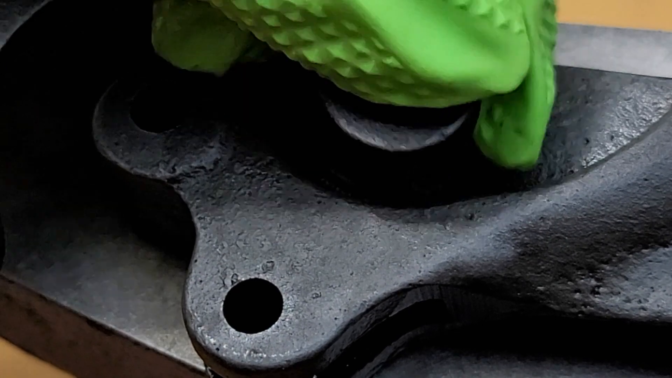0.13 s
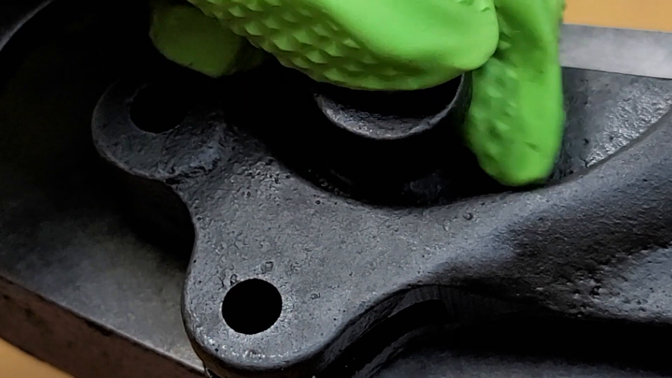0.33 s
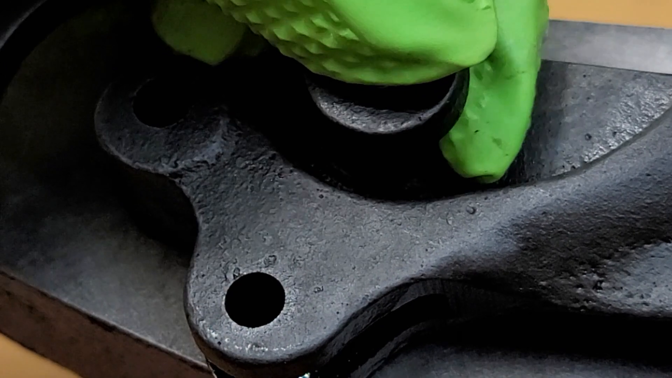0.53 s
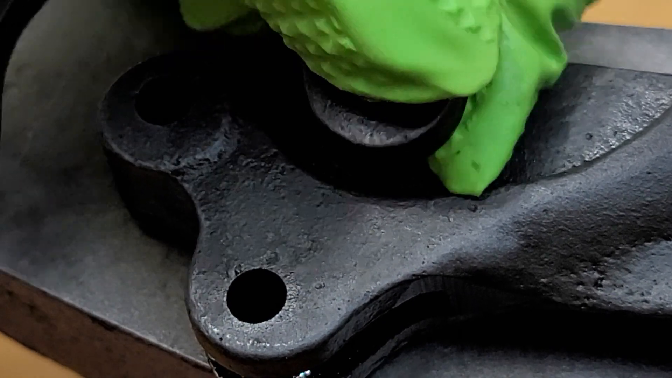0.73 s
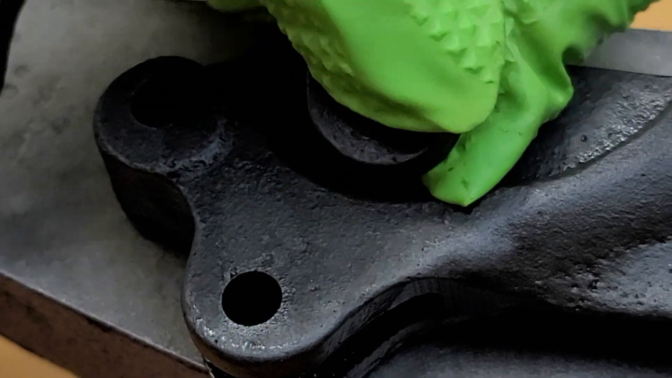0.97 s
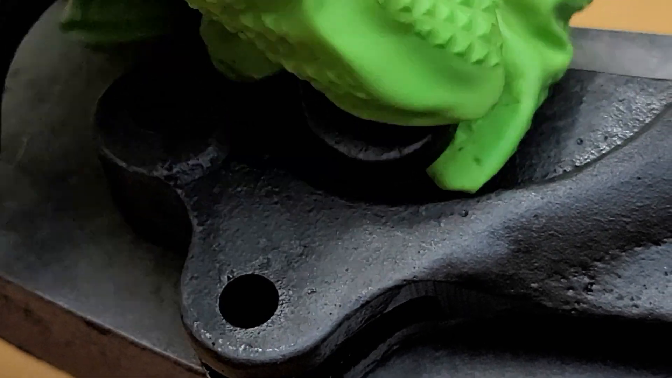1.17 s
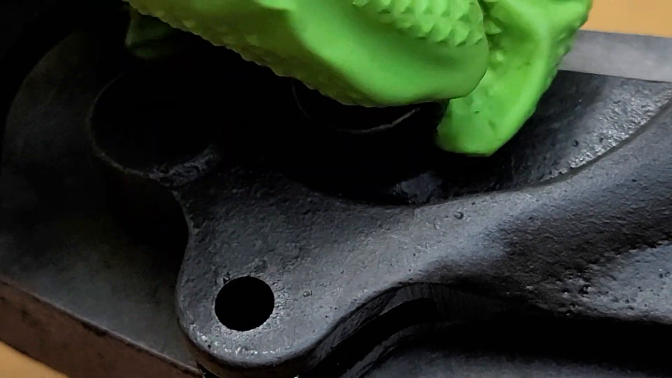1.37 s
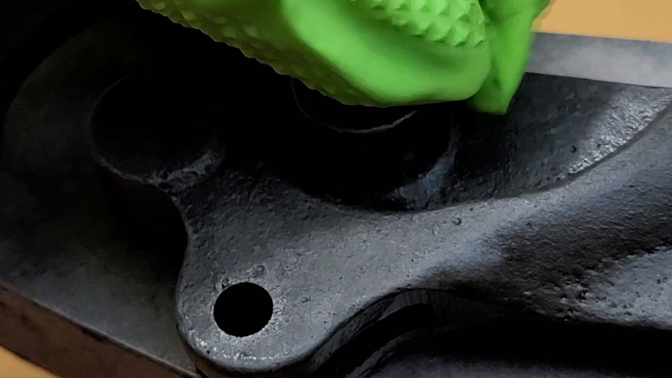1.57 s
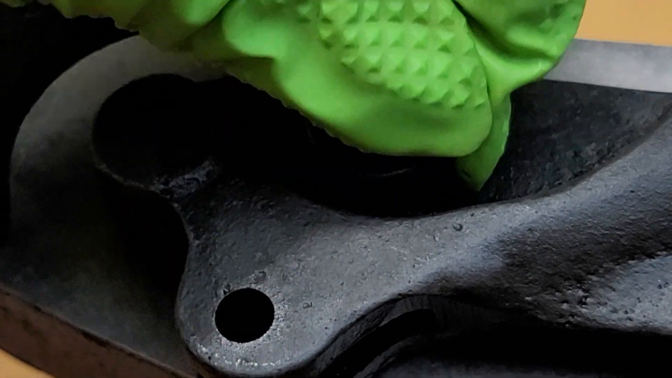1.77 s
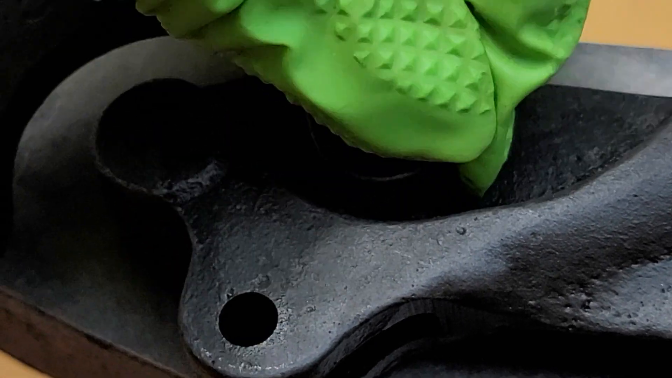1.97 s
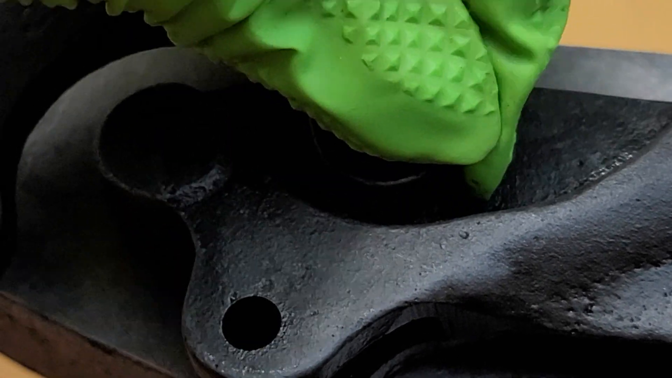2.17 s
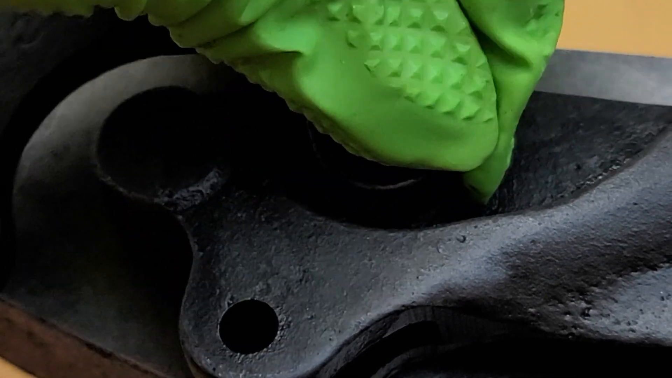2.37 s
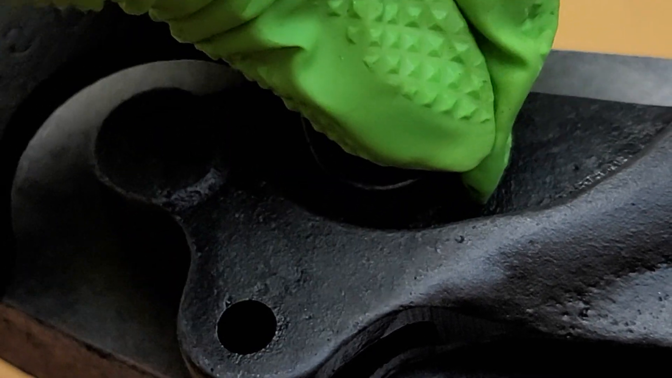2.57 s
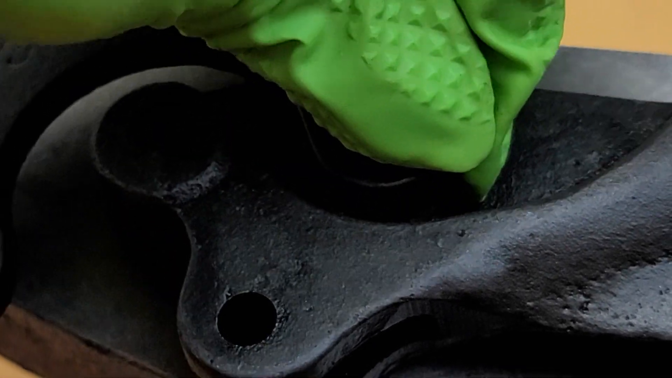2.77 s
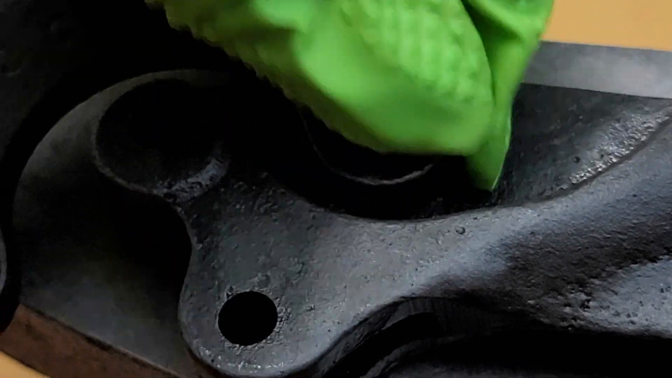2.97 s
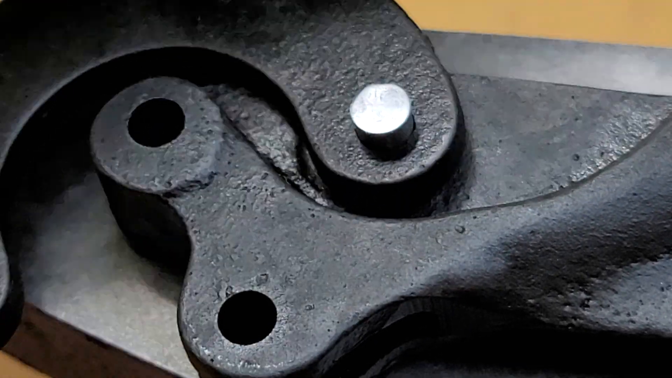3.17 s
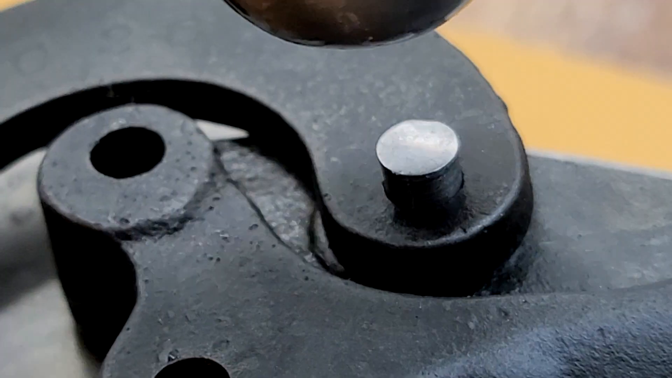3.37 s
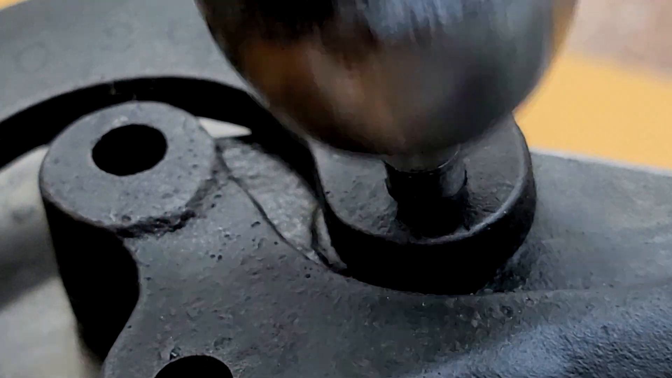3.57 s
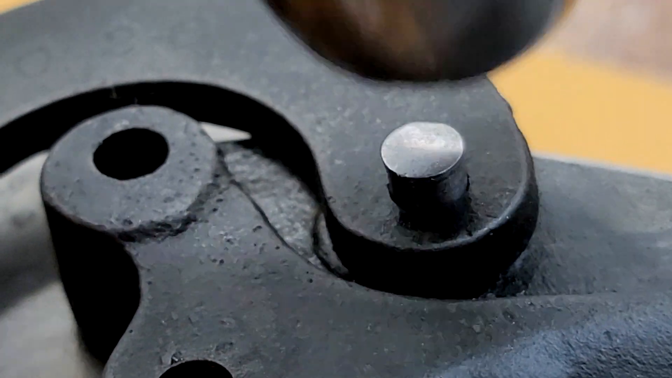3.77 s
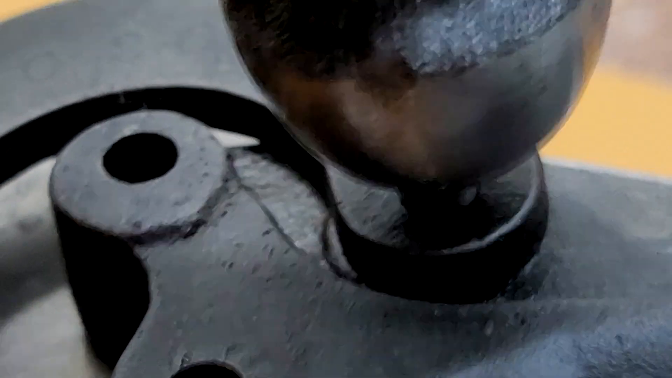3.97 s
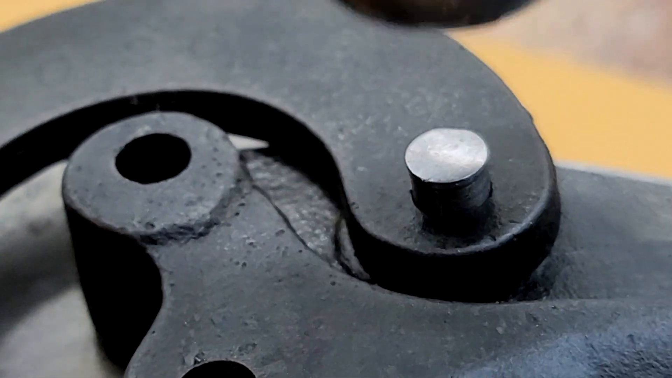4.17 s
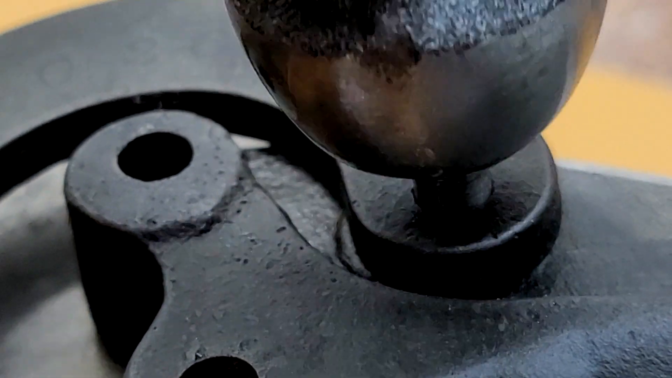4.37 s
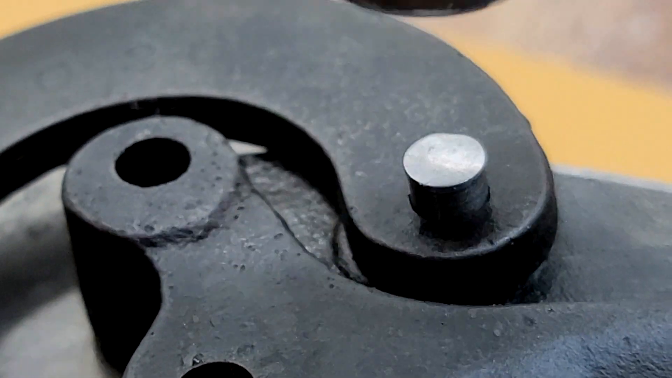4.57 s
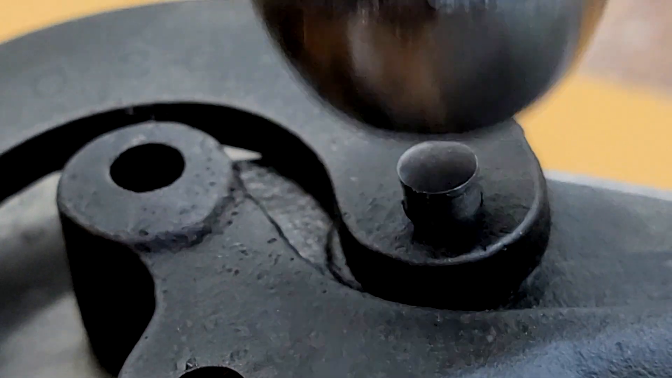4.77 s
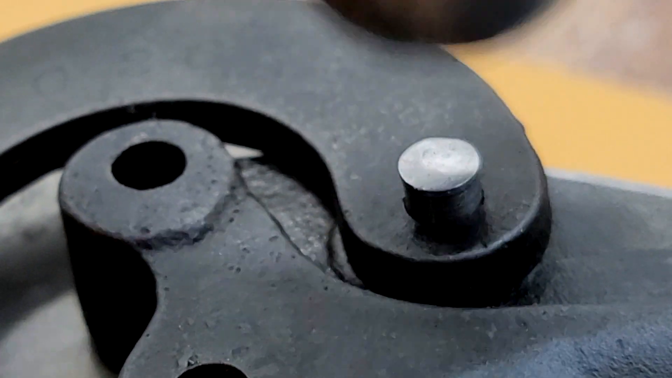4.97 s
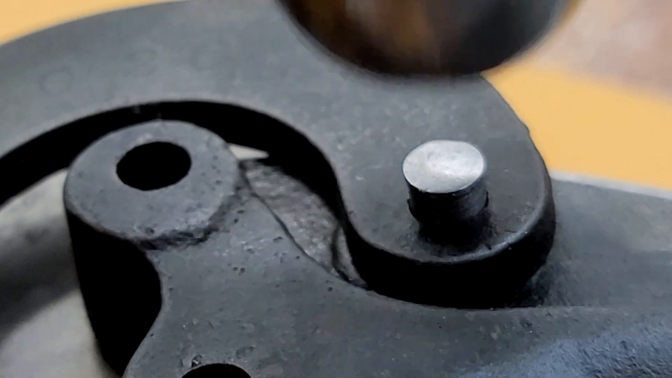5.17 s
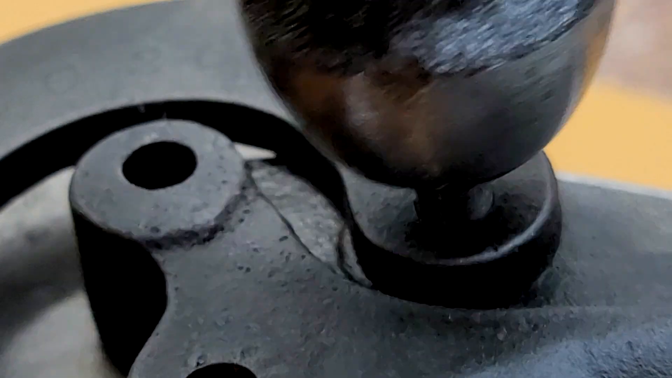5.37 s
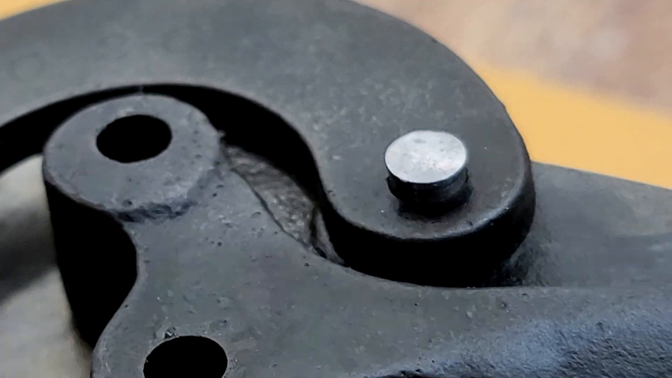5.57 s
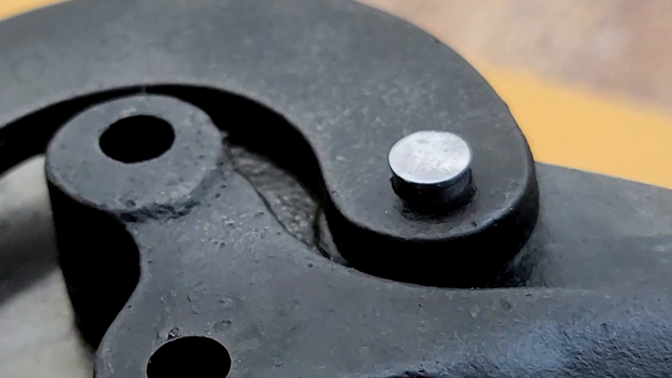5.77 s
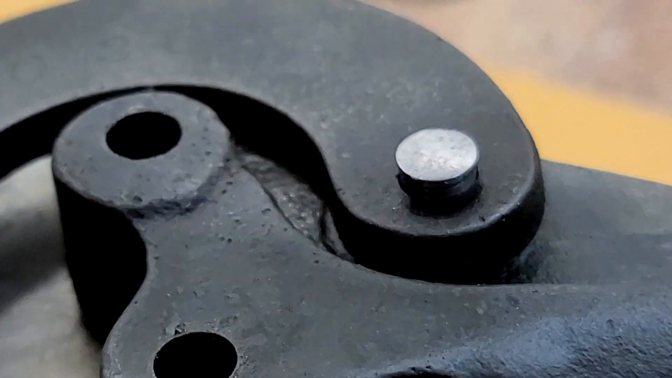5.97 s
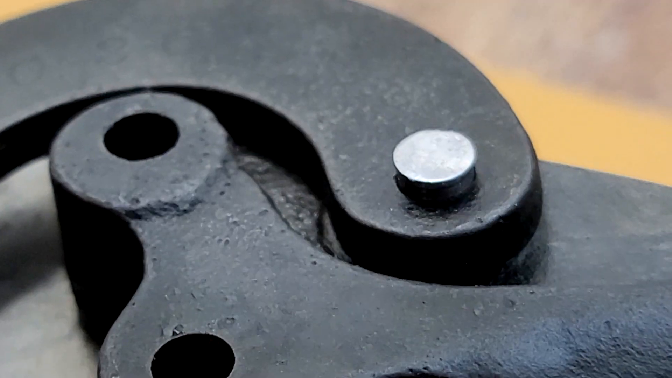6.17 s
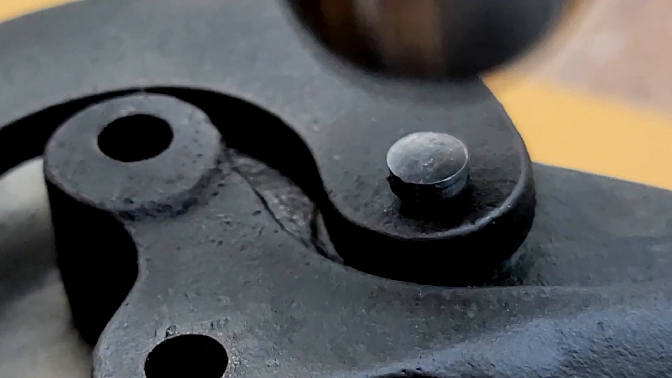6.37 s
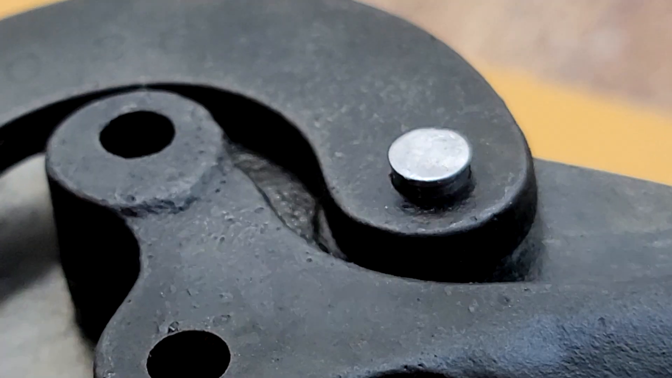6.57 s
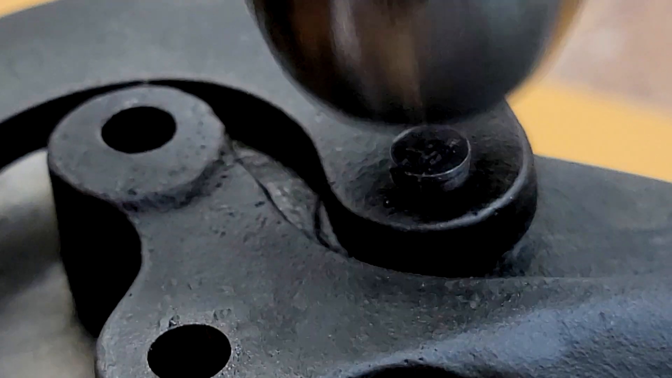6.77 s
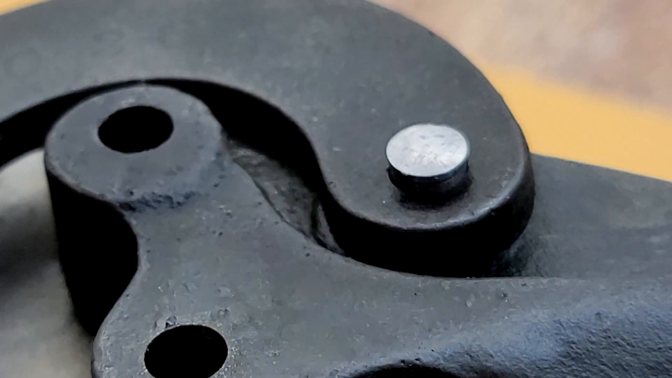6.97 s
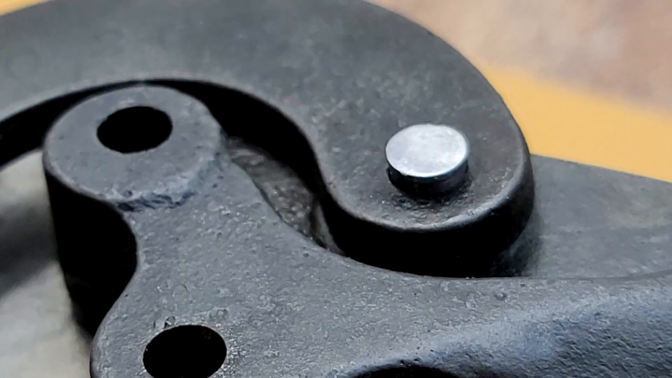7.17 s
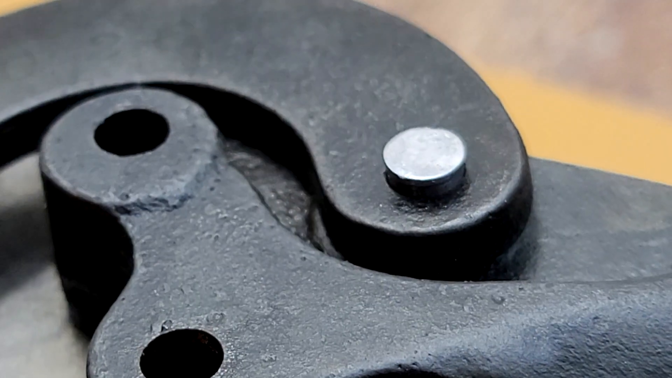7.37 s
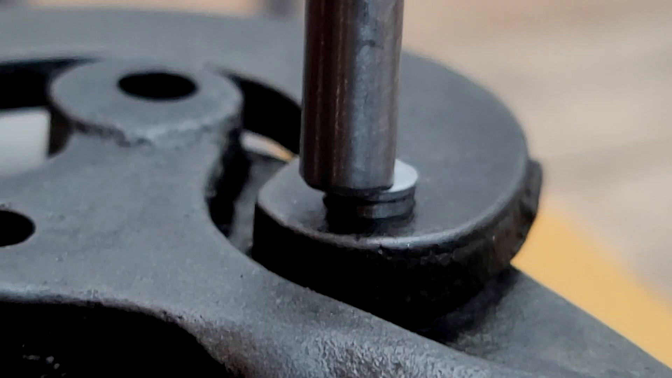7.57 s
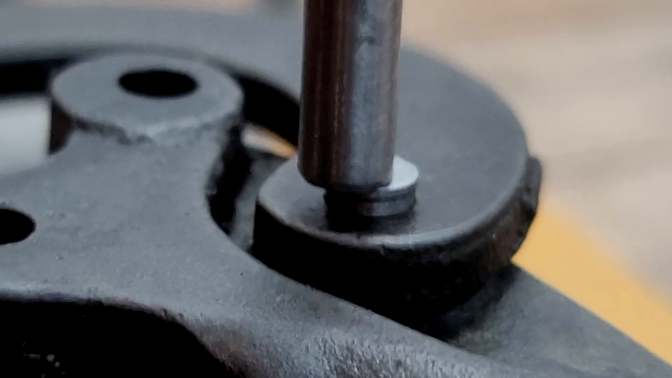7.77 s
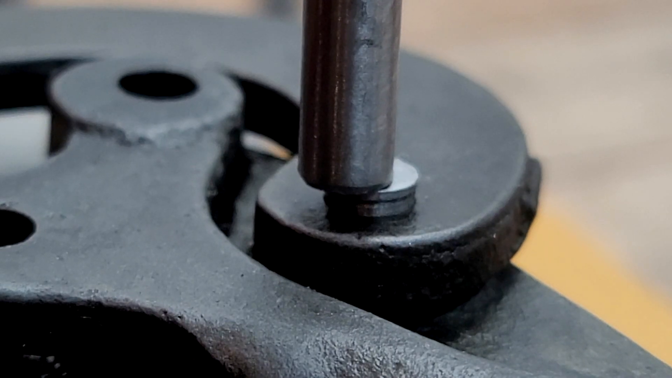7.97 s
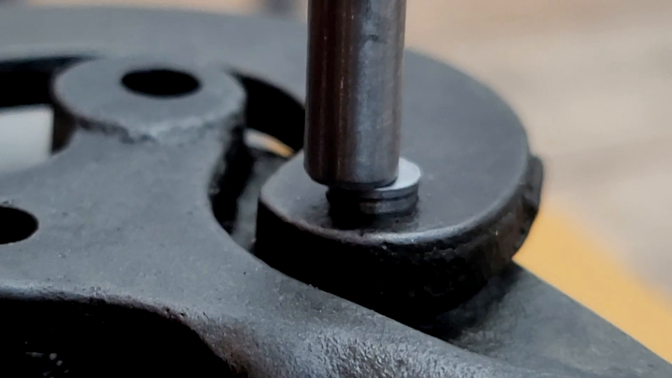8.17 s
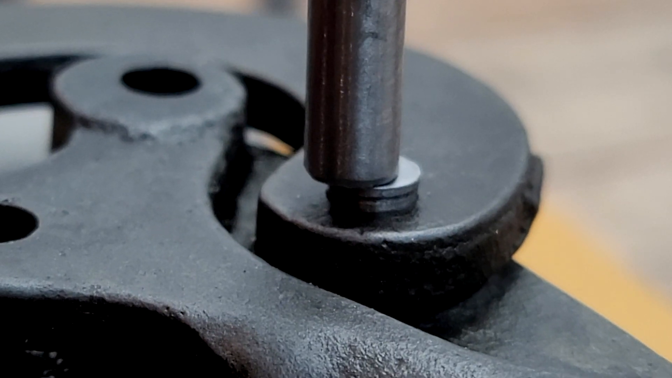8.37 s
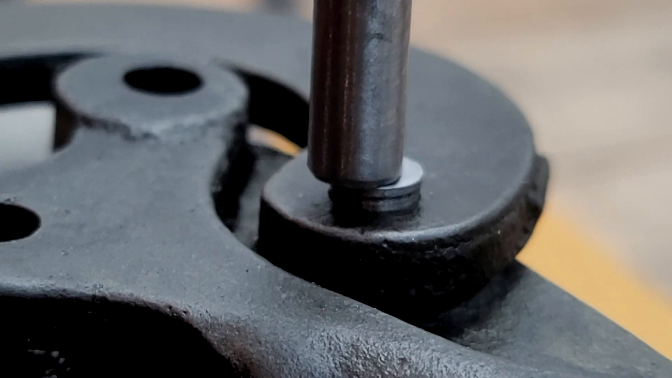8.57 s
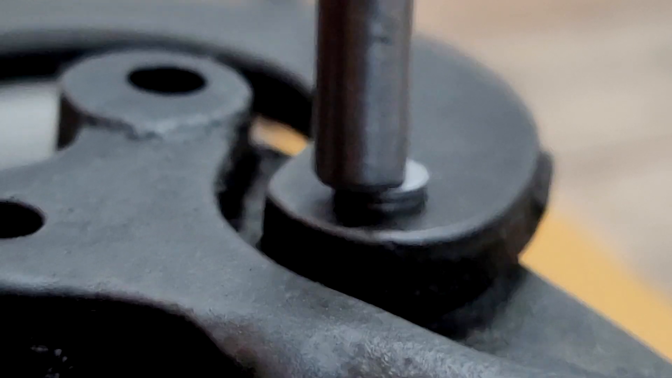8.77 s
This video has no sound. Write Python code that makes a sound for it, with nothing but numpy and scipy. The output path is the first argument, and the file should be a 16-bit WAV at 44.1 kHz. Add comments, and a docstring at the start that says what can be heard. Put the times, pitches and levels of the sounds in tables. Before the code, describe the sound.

Close up in a workshop, rubber gloves rub faintly on iron and a part clinks down. After a quiet pause, a hammer strikes a loose rivet with short, dull, thumping clacks, about three per second. The blows turn brighter and more ringing as the rivet seats, spaced wider. Finally, higher, harder and louder clinks come from a hammered punch. Low room rumble lies beneath.

```python
"""Peening a rivet

A rivet is peened into an iron linkage on a steel block on a workbench, close to two microphones.
Gloved hands set the parts in place; a hammer strikes the loose rivet, then the seated one, then a punch.
Each contact is a coloured noise crack over decaying sine modes; hammer and punch blows also thump block and bench.
The workshop answers with decaying noise bands and low resonances; rumbling air noise and faint rising
chirps lie beneath."""
import sys
import numpy as np
from scipy import signal
from scipy.fft import rfft, irfft, next_fast_len
from scipy.io import wavfile
from scipy.ndimage import uniform_filter1d, map_coordinates

SR = 44100
rng = np.random.default_rng(int(sys.argv[2]) if len(sys.argv) > 2 else 0)


def wav_record(signal):
    """Record a signal, one row per channel, as 16-bit PCM in the file named by sys.argv[1]."""
    frames = np.transpose(np.atleast_2d(signal))
    bounded = np.clip(frames, -1, 1)
    # unit amplitude maps onto the largest positive 16-bit level
    quanta = np.round(bounded * 32767).astype(np.int16)
    wavfile.write(sys.argv[1], SR, quanta)


N = 389403
RING = np.arange(SR // 3) / SR  # time since a contact (s)


def hammering():
    """Hammer on the rivet; once seated, the linkage rings brighter, longer and louder in the room."""
    # hammer blows: t/s, level/dB, brightness/dB
    blows = [(3.5495, -30, -1), (3.9234, -27.5, -1), (4.2993, -27.5, -1.2), (4.656, -27, 1.5),
             (5.0002, -26.5, 4.5), (5.3404, -26, 3), (5.767, -25, 1), (6.2175, -24.5, 0.5),
             (6.6435, -26, 0)]
    # the linkage jumps and drops back on the block: t/s, level/dB
    rebounds = [(3.95, -39), (3.953, -42.5), (4.313, -36.5), (4.675, -35), (5.0152, -30), (5.033, -40.5),
                (5.356, -31), (5.364, -32.5), (5.792, -36.5), (5.798, -33.5), (6.244, -36), (6.251, -42),
                (6.666, -35.5), (6.678, -37)]
    # modes of the riveted linkage: f/Hz, level/dB
    iron_modes = [(900, -11), (1077, -4.5), (1562, -6), (1774, -11), (1927, -9), (2165, -6), (2351, -5),
                  (2490, 1), (2685, 0), (2840, -2), (3015, -4), (3478, -8), (4130, -7), (4468, -4),
                  (5320, -7), (5782, -11), (5997, -6), (6681, -15), (9335, -20), (10314, -22), (10745, -18),
                  (12387, -14), (13100, -17), (14130, -18)]
    # colour of the crack with the rivet loose, then seated: f/Hz, level/dB
    loose_crack = [(200, -22), (700, -7.5), (1100, -2.5), (2000, -6.5), (2500, 7), (3300, -4), (4300, -7.5),
                   (6000, -10), (8300, -25), (10500, -24.5), (14300, -12), (16000, -28.5)]
    seated_crack = [(40, -33.5), (200, -8.5), (500, -6), (1100, 2.5), (1600, -2.5), (2100, -1.5), (2700, 7),
                    (3600, -2.5), (4200, 1.5), (4800, -2), (5350, 1.5), (6200, -1), (8300, -22),
                    (9400, -11.5), (11800, -12.5), (12600, -7), (16000, -16.5)]
    # thump relative to the metal, rivet loose, then seated: bench level/dB, block level/dB
    loose_thump = (10.3, -4.5)
    seated_thump = (0.99, -4)
    seated_from_s = 5.6  # from here on the rivet sits tight in its hole
    loose_t60, seated_t60 = 0.02, 0.049  # crack decay (s)
    loose_wet_db, seated_wet_db = -2, 3  # send to the workshop
    loose_rebound_db, seated_rebound_db = -12.5, -6.5  # brightness of the linkage dropping back

    near, far = np.zeros((2, N)), np.zeros((2, N))
    iron = metal(iron_modes, ring_t60=0.06)
    for s, db, bright_db in blows:
        if s > seated_from_s:
            clang = iron(seated_crack, seated_t60, ring_db=-2.5, bright_db=bright_db, high_modes_db=9.5)
            thump, wet_db = support(*seated_thump), seated_wet_db
        else:
            clang = iron(loose_crack, loose_t60, ring_db=-1.0, bright_db=bright_db, high_modes_db=2.0)
            thump, wet_db = support(*loose_thump), loose_wet_db
        blow = amp(db) * (clang + thump)
        add(near, s, blow)
        add(far, s, amp(wet_db) * blow)
    for s, db in rebounds:
        bright_db = seated_rebound_db if s > seated_from_s else loose_rebound_db
        clack = amp(db) * iron(seated_crack, crack_t60=0.044, ring_db=0.0, bright_db=bright_db)
        add(near, s, clack)
        add(far, s, clack)
    return near, far


def punching(crack_t60=0.089, wet_db=-1.5):
    """Hammer on the punch: a higher clink with less thump; of the first blow only the dying tail is heard."""
    # hammer blows on the punch: t/s, level/dB, brightness/dB
    blows = [(7.418, -16.5, -3.5), (7.7233, -21.5, 0), (8.0377, -21.5, 0.5), (8.372, -21, -1.7),
             (8.742, -23.5, 2)]
    # the punch bounces on the rivet: t/s, level/dB
    bounces = [(8.047, -37), (8.755, -31), (8.765, -35)]
    # modes of the punch standing on the rivet: f/Hz, level/dB
    rod_modes = [(1324, -7), (1922, -17), (2724, -11), (3009, -7), (3348, -16), (4463, -5), (4775, -7),
                 (5030, -6), (5315, -3), (5469, 2), (5795, -1), (5986, 1), (6248, -3), (6358, -2),
                 (7171, -4), (7537, -2), (8764, -7), (9351, -5), (10083, -12), (10740, -9), (11117, -11),
                 (12382, -6), (13124, -5)]
    # colour of the contact crack: f/Hz, level/dB
    punch_crack = [(40, -41.5), (200, -7.5), (700, -10.5), (1300, -3), (1800, -15), (2900, -2), (3600, -10),
                   (4600, -3), (5900, -2), (8200, -11), (9400, -5), (13000, -13), (16000, -17)]
    # thump relative to the metal: bench level/dB, block level/dB
    bench_db, block_db = (-7.5, -12.5)
    heard_from_s = 7.607  # this layer enters abruptly here
    firming_db_per_s = 5  # as the rivet head flattens, more of each blow reaches the block
    lead_s, lead_db = 0.0077, -12.5  # a fainter clink leads each punch blow by lead_s

    near = np.zeros((2, N))
    rod = metal(rod_modes, ring_t60=0.035)
    for s, db, bright_db in blows:
        lead_clink = rod(punch_crack, crack_t60, ring_db=9.5, bright_db=-3.0)
        add(near, s - lead_s, amp(db + lead_db) * lead_clink)
        thump = support(bench_db, block_db + firming_db_per_s * (s - heard_from_s))
        clink = rod(punch_crack, crack_t60, ring_db=7, bright_db=bright_db)
        add(near, s, amp(db) * (clink + thump))
    for s, db in bounces:
        add(near, s, amp(db) * rod(punch_crack, crack_t60, ring_db=10.5, bright_db=-4.0))
    heard = np.arange(N) > heard_from_s * SR
    return (place(near, left_db=-2.5) + workshop(amp(wet_db) * near)) * heard


def metal(table, ring_t60, spread=1.32, split=0.0066, detune=0.0044, fresh=0.87, rise_s=0.0018,
          chatter_db=3.0, tick_db=-1.5, tick_s=0.0018, tick_width_s=0.00058):
    """Steel object: a maker of contacts, each ringing close pairs of modes under a tick and chattering crack."""
    pairs = []
    for hz, db in table:
        for offset in (0, rng.standard_normal()):  # each mode has a slightly detuned, weaker twin
            twin_hz = hz * (1 + offset * split)
            twin_t60 = ring_t60 * (hz / 3000) ** -.12  # high modes die sooner
            pairs.append((twin_hz, db - 5 * abs(offset), twin_t60))
    ringing = modes(pairs, spread) * rng.choice([-1, 1], (len(pairs), 1, 1))
    dense = stereo_noise(len(RING), 900)  # the grain that all contacts of this object share
    rise = 1 - np.exp(-RING / rise_s)
    attack = rise + amp(tick_db) * np.exp(-((RING - tick_s) / tick_width_s) ** 2)

    def contact(crack_colour, crack_t60, ring_db, bright_db, high_modes_db=0):
        """One contact: the crack, then the ring scaled relative to it."""
        chatter = amp(chatter_db * flutter(len(RING), step_s=.001))
        grain = (dense + fresh * stereo_noise(len(RING), 800)) * chatter
        crack = unit(colour(even(grain * fade(crack_t60)) * attack, crack_colour))
        # the joint sits a little differently each time, which shifts its modes
        stretch = 1 + detune * rng.standard_normal()
        struck = strike(ringing, scatter_db=5.5)
        ring = np.array([map_coordinates(port, [RING * SR * stretch]) for port in struck])
        # a firmer contact drives the high modes harder
        ring = unit(colour(ring, [(2500, 0), (9000, high_modes_db)]))
        sound = crack + amp(ring_db) * ring * rise
        return unit(colour(sound, [(1500, 0.00053), (10000, bright_db)]))
    return contact


def support(bench_db, block_db, lag_s=.0018, low_hz=58):
    """The blow passes through the block into the bench; they swing a moment later, with no deep bass."""
    # modes of the bench top: f/Hz, level/dB, t60/s
    bench_modes = [(69.8, -13.5, 0.36), (88.85, -6.5, 0.28), (107.1, 1.5, 0.23)]
    # modes of the block rocking on the bench: f/Hz, level/dB, t60/s
    block_modes = [(156.1, 3.5, 0.21), (189.3, 5.5, 0.16), (213.3, 1.5, 0.11), (248.7, -6, 0.058),
                   (372, -5, 0.13)]
    bench = amp(bench_db) * strike(modes(bench_modes, spread=.28), scatter_db=1)
    block = amp(block_db) * strike(modes(block_modes, spread=0.66), scatter_db=3.5)
    swing = -(bench + block) * np.linspace(1, 0, len(RING))
    thump = np.pad(swing, ((0, 0), (int(lag_s * SR), 0)))[:, :len(RING)]
    return signal.sosfilt(signal.butter(4, low_hz, "high", fs=SR, output="sos"), thump)


def strike(ringing, scatter_db):
    """Each contact lands on a slightly different spot and shares its energy differently among the modes."""
    shares = amp(scatter_db * rng.standard_normal(len(ringing)))
    return unit(np.tensordot(shares, ringing, 1))


def modes(table, spread):
    """Decaying sines (mode, microphone, time); each reaches the two microphones spread radians apart."""
    side = np.array([[.5], [-.5]]) * spread
    return np.array([amp(db) * fade(t60) * np.sin(2 * np.pi * hz * RING + (-1) ** k * side)
                     for k, (hz, db, t60) in enumerate(table)])


def handling(grain_db=2.0, patchy_db=3.5, wet_db=-5):
    """Parts knock together while gloves rub over them in tiny, uneven slips whose colour shifts."""
    # colour of rubber on iron: f/Hz, level/dB
    rub_colour = [(650, -50.5), (1100, -17), (1950, -11.5), (2280, -16), (2610, -4.5), (3050, -6),
                  (5840, -10.5), (7470, -19.5), (7990, -49), (9240, -24.5), (11800, -21), (16000, -28.5)]
    # the rubber catches and snaps free: t/s, level/dB
    snaps = [(.324, -51), (0.911, -56), (1.228, -50), (1.555, -53), (2.969, -46), (2.991, -59),
             (3.039, -58)]
    # parts set down and nudged; a part held in the hand hardly rings:
    # t/s, metal level/dB, brightness/dB, ring level/dB, bench level/dB, block level/dB
    knocks = [(0.825, -27, 4.5, 3, -40.5, -43.5), (1.253, -78, 3, -12, -48, -68),
              (1.645, -54, -23, 7, -69.5, -55.5), (1.659, -42, -48, 9, -48, -65),
              (1.675, -44, -11, 3, -44, -47.5), (1.698, -68, -6, -6, -40, -66),
              (2.644, -63.5, 8, 0, -56, -72), (2.6761, -50.5, -9.5, -10, -35.5, -43),
              (4.151, -59, -26, -8, -58.5, -69)]
    # modes of the loose link: f/Hz, level/dB
    link_modes = [(1157, -1), (1830, -10), (1997, -10), (2396, -13), (3031, -1), (4215, -10), (5841, -2),
                  (7246, -17), (9173, -13), (10745, -3), (12409, -12), (13361, -12)]
    # colour of the link's contact crack: f/Hz, level/dB
    link_crack = [(40, -18), (200, 1.5), (700, -6.5), (1100, 13), (1500, -14), (2000, 2.5), (3500, 0.5),
                  (6000, -5.5), (8200, -10.5), (11000, -6.5), (16000, -7.5)]

    slips = colour(stereo_noise(N, 1500) * amp(grain_db * flutter(N, step_s=.002)), rub_colour)
    size = next_fast_len(N, real=True)
    spectrum, hz = rfft(slips, size), np.fft.rfftfreq(size, 1 / SR)
    centres = np.geomspace(1000, 14000, 16)  # bands whose levels wander independently (Hz)
    rub = np.zeros((2, N))
    for share in np.eye(len(centres)):
        band = irfft(spectrum * np.interp(hz, centres, share))[:, :N]
        rub += band * amp(patchy_db * flutter(N, step_s=.06))
    near = rub / rub.std() * sliding()

    for s, db in snaps:
        snap = unit(colour(stereo_noise(len(RING), 1500) * fade(t60=0.15), rub_colour))
        add(near, s, amp(db) * snap)
    link = metal(link_modes, ring_t60=0.055)
    for s, db, bright_db, ring_db, bench_db, block_db in knocks:
        clink = link(link_crack, crack_t60=0.032, ring_db=ring_db, bright_db=bright_db)
        add(near, s, amp(db) * clink + support(bench_db, block_db))
    return place(near, left_db=3.0), amp(wet_db) * near


def sliding():
    """Friction level: each slide swells, holds and dies away over the faint creep of the grip."""
    # a rubber glove slides over the iron: t/s, length/s, level/dB
    rubs = [(0.0, .06, -47), (0.061, .05, -51.5), (0.306, .035, -55), (0.872, 0.045, -53.5),
            (1.007, 0.047, -49.5), (1.202, 0.051, -47.5), (1.368, 0.036, -54.5), (1.486, 0.14, -57),
            (1.639, 0.097, -54.5), (2.969, 0.025, -58.5), (2.998, 0.086, -58.5), (7.132, .06, -74.5)]
    attack_s, release_s = 0.013, 0.01  # time constants of a slide
    grip_db, grip_until_s = -68, 1.76  # the gloves creep faintly while they hold the parts
    t = np.arange(N) / SR
    levels = [amp(grip_db) * (t < grip_until_s)]
    for s, length, db in rubs:
        swell = np.minimum(t - s, 0) / attack_s
        release = np.maximum(t - s - length, 0) / release_s
        levels.append(amp(db) * np.exp(swell - release))
    return np.max(levels, axis=0)


def workshop(x, room_db=-17.0, build_s=0.002, floor_db=-14, floor_t60=0.46):
    """Diffuse reflections: noise bands build up quickly and die away at their own rates, over low resonances."""
    # reverberation bands: f/Hz, level/dB, t60/s
    bands = np.array([(59, 21, 0.3), (99, -5, 0.82), (183, 5.5, 0.76), (346, 22.5, 0.42), (734, 5.5, 0.64),
                      (1500, 1.5, 0.47), (2680, 2, 0.76), (6200, 0, 0.88), (8300, -5, 1), (9600, 2, 0.27),
                      (14400, -23, .3)])
    noise = rfft(stereo_noise(SR, 410))
    hz, t = np.arange(SR // 2 + 1), np.arange(SR) / SR
    response = standing_waves(t)
    for share, (_, db, t60) in zip(np.eye(len(bands)), bands):
        band = irfft(noise * along(hz, np.c_[bands[:, 0], share]))
        tail = amp(db + room_db) * np.exp(-np.log(1000) * t / t60) / np.sqrt(t60)
        # a second decay, the same length in every band
        common = amp(min(db, 0) + floor_db) * np.exp(-np.log(1000) * t / floor_t60) / np.sqrt(floor_t60)
        response = response + band * np.hypot(common, tail) * np.sqrt(np.log(1000) / SR)
    return signal.fftconvolve(x, response * (1 - np.exp(-t / build_s)), axes=1)[:, :N]


def standing_waves(t):
    """A few low room resonances, decaying sines that hum on after each blow."""
    # standing waves of the workshop: f/Hz, gain/dB, t60/s
    resonances = [(63.3, -3.5, .8), (83, -15, 0.66), (103, -9.5, 0.19), (192.6, -8, 0.26), (335, 2.5, 1),
                  (380, 2, 0.57), (420, -3, 0.43)]
    decay = np.log(1000)
    return sum(amp(db) * 2 * decay / (t60 * SR) * np.exp(-decay * t / t60) * np.sin(2 * np.pi * hz * t)
               for hz, db, t60 in resonances)


def background(air_db=-63):
    """Steady low rumble and faint hiss of coloured noise, with a few rising sine chirps."""
    # colour of the room air: f/Hz, level/dB
    air_colour = [(15, -59.5), (25, -29), (48, -2.5), (64, -3.5), (127, -9.5), (153, -24), (223, -14),
                  (293, -25), (363, -19.5), (1020, -32.5), (1520, -29.5), (2910, -32), (3620, -32),
                  (6800, -37), (8200, -54.5), (12000, -51), (16000, -55.5)]
    # faint rising chirps: t/s, length/s, start f/Hz, end f/Hz, level/dB
    chirps = [(3.262, 0.081, 3250, 3800, -64.5), (4.89, 0.11, 3250, 3650, -68),
              (7.351, 0.16, 3950, 4800, -73), (7.502, 0.11, 4050, 4140, -71.5)]
    air = colour(stereo_noise(N, 360), air_colour)
    air *= amp(air_db) / air.std()
    for s, length, start_hz, end_hz, db in chirps:
        u = np.linspace(0, 1, int(length * SR))
        glide_hz = start_hz + (end_hz - start_hz) * u ** .7  # rises fastest at the start
        chirp = amp(db) * np.sin(np.pi * u) * np.sin(2 * np.pi * np.cumsum(glide_hz) / SR)
        add(air, s, np.array([chirp, chirp]))
    return air


def amp(db):
    """Decibels to gain."""
    return 10 ** (np.asarray(db) / 20)


def unit(x):
    """Scale a hit so that its energy equals rms 1 held for 40 ms."""
    return x / np.sqrt(np.sum(x ** 2) / 2 / (.04 * SR))


def along(hz, points):
    """Read (f/Hz, value) points on a log-frequency axis."""
    f, value = np.transpose(points)
    return np.interp(np.log(np.maximum(hz, 1)), np.log(np.sort(f)), value)


def colour(x, points):
    """Minimum-phase filter through (f/Hz, level/dB) points: it never sounds ahead of its input."""
    size = next_fast_len(x.shape[-1] + 4096, real=True) // 2 * 2
    hz = np.arange(size // 2 + 1) * SR / size
    cepstrum = irfft(np.log(amp(along(hz, points))))
    cepstrum[1:size // 2] *= 2  # fold the cepstrum onto positive time
    cepstrum[size // 2 + 1:] = 0
    return irfft(rfft(x, size) * np.exp(rfft(cepstrum)))[..., :x.shape[-1]]


def stereo_noise(size, apart_hz):
    """Noise at two microphones: alike in the bass, unrelated above apart_hz."""
    mid, side = rng.standard_normal((2, size))
    side = signal.sosfilt(signal.butter(1, apart_hz, "high", fs=SR, output="sos"), side)
    return np.array([mid + side, mid - side])


def even(x, width_hz=450):
    """Level the broad humps of a short burst, so that a contact feeds all frequencies alike."""
    spectrum = rfft(x)
    power = uniform_filter1d(abs(spectrum) ** 2, max(1, int(width_hz * x.shape[1] / SR)), axis=1)
    levelled = irfft(spectrum / np.sqrt(power), x.shape[1])
    lead = int(.001 * SR)  # 1 ms of room for what spills ahead of the onset
    return np.roll(levelled, lead, axis=1) * np.linspace(1, 0, x.shape[1])


def flutter(size, step_s):
    """Random values joined by straight lines, a new one every step_s."""
    times = np.arange(size) / SR
    return np.interp(times / step_s, np.arange(size // 8), rng.standard_normal(size // 8))


def fade(t60):
    """Exponential decay after a contact, 60 dB in t60 seconds."""
    return np.exp(-np.log(1000) * RING / t60)


def add(track, s, sound):
    """Mix a sound into the track at time s."""
    start = int(s * SR)
    track[:, start:start + sound.shape[1]] += sound[:, :N - start]


def place(x, left_db):
    """Lean a sound towards the left microphone, or the right if left_db is negative."""
    return x * amp([[left_db / 2], [-left_db / 2]])


def scene():
    """Direct sound, its reverberation and the background."""
    near, far = np.sum([handling(), hammering()], axis=0)
    return near + workshop(far) + punching() + background()


def record(dry):
    """The left microphone takes more top, the right more midrange; the top octave ends steeply."""
    # f/Hz, level/dB: added on the left, taken off on the right
    lean = np.array([(80, 0), (700, -0.3), (2500, -1.5), (6000, 0.13), (10000, 0.5), (13000, 2.5)])
    ports = np.array([colour(dry[0], lean), colour(dry[1], lean * [1, -1])])
    top_hz = 16000
    return signal.sosfilt(signal.ellip(8, .2, 70, top_hz, fs=SR, output="sos"), ports)


dry = scene()
out = record(dry)
wav_record(out)
```